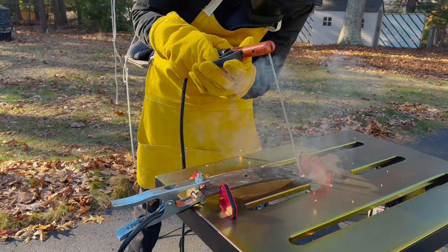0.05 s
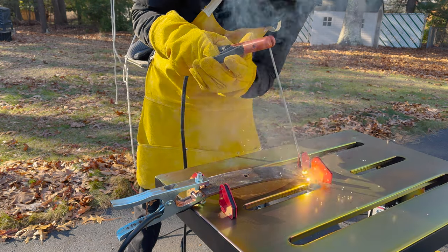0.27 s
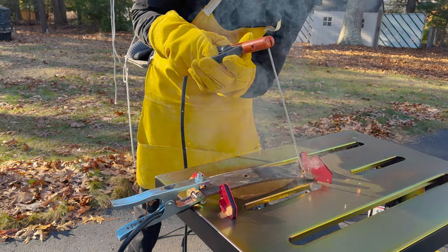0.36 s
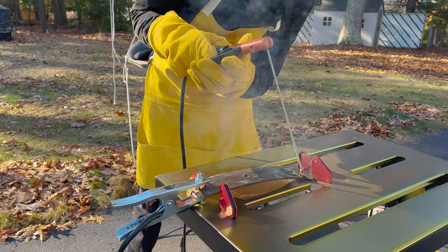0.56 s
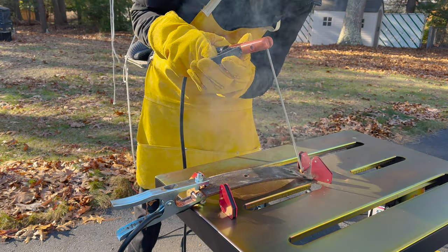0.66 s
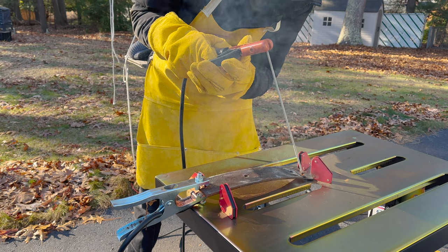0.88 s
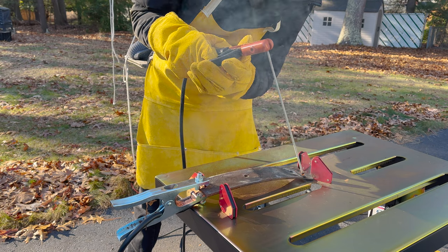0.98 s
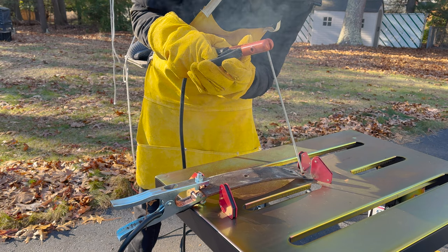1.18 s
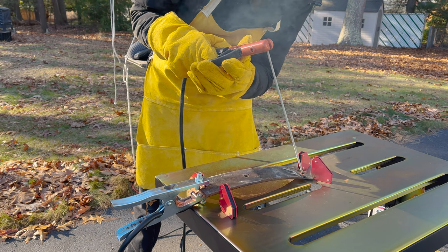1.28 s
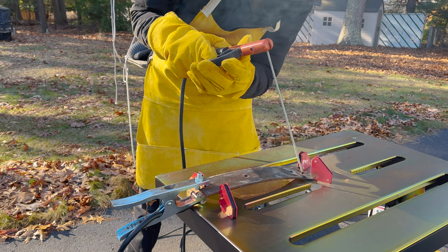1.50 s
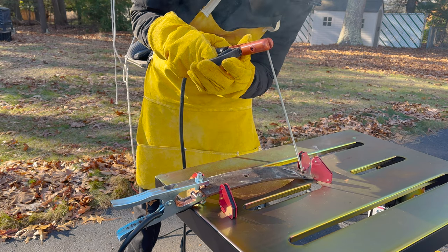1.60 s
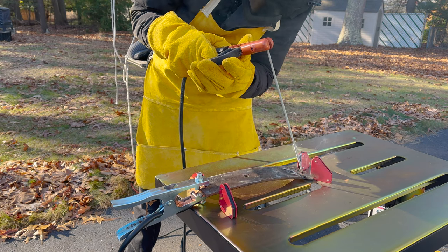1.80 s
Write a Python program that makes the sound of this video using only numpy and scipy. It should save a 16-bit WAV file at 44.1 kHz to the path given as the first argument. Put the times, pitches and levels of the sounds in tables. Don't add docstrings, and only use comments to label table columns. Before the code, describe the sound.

Welding rod on a steel table: brief crackle, two sharp thumping pops, then fading fizz and spits

```python
import sys
import numpy as np
from scipy import signal
from scipy.fft import rfft, irfft, next_fast_len
from scipy.io import wavfile
from scipy.ndimage import uniform_filter1d, map_coordinates

SR = 44100
rng = np.random.default_rng(int(sys.argv[2]) if len(sys.argv) > 2 else 0)


def field_ratio(decibels):
    return 10 ** (np.asarray(decibels, dtype=float) / 20)


def dump_mix(stems):
    frames = np.atleast_2d(stems).T
    limited = np.clip(frames, -1, 1)
    pcm = np.round(limited * 32767).astype(np.int16)
    wavfile.write(sys.argv[1], SR, pcm)


N = 81585


def unit(x):
    return x / np.sqrt(np.mean(x ** 2) + 1e-20)


def along(points, hz):
    f, v = np.transpose(points)
    return np.interp(np.log(hz + 1), np.log(f + 1), v)


def filtered(x, response):
    m = next_fast_len(N + 8192)
    return irfft(rfft(x, m) * response(np.fft.rfftfreq(m, 1 / SR)), m)[..., :N]


def coloured(x, spectrum):
    mean = np.sqrt(np.mean(field_ratio(along(spectrum, np.linspace(0, SR / 2, 999))) ** 2))
    return filtered(x, lambda hz: field_ratio(along(spectrum, hz)) / mean)


def wobble(rate):
    return map_coordinates(rng.standard_normal(N // 20), [np.arange(N) * rate / SR])


def since(s):
    t = np.arange(N) / SR - s
    return np.maximum(t, 0), t >= 0


def ring(s, modes):
    t, on = since(s)
    return on * sum(field_ratio(db - 60 * t / t60) * np.sin(2 * np.pi * hz * t) for hz, db, t60 in modes)


def crackle(rate, spread_db, bed):
    spike_db = np.minimum(spread_db * rng.exponential(size=N), 15)
    spikes = (rng.random(N) < rate / SR) * field_ratio(spike_db)
    return unit(rng.standard_normal(N) * (bed + uniform_filter1d(spikes, size=12) * 12))


def echo(x, t60s, wait_s):
    hz, t, z = signal.stft(rng.standard_normal(SR // 2), SR, nperseg=128)
    tail = signal.istft(z * field_ratio(-60 * t / along(t60s, hz)[:, None]), SR, nperseg=128)[1]
    return signal.fftconvolve(np.pad(x, (round(wait_s * SR), 0)), tail / np.linalg.norm(tail))[:N]


def road():
    # frequency in Hz, level in dB.
    road_spectrum = [(15, -49.5), (30, -14), (42, -10), (59, -1.5), (140, -12), (268, -17), (386, -10.5),
                     (488, -24.5), (515, -16.5), (1900, -26), (2470, -44), (4180, -120)]
    # frequency in Hz, likeness of left and right from -1 to 1.
    road_alike = [(30, .997), (90, 0.98), (180, 0.8), (500, 0.95), (720, -0.38), (1400, -0.43),
                  (1750, 0.74), (2100, .92)]

    def mid_and_side(hz):
        angle = np.arccos(np.clip(along(road_alike, hz), -1, 1)) / 2
        return field_ratio(along(road_spectrum, hz)) * [np.ones(len(hz)), np.tan(np.minimum(angle, 1.2))]

    swell = field_ratio(0.34 * wobble(9.1) + 0.27 * wobble(25))
    mid, side = filtered(rng.standard_normal((2, N)) * swell, mid_and_side)
    return field_ratio(-42.5) * np.array([mid + side, mid - side]) / np.std(mid)


def open_air():
    # frequency in Hz, level in dB.
    air_spectrum = [(1500, -30), (1900, -12.5), (2400, -5.5), (3100, -16), (4200, -22), (4700, -27),
                    (11500, -41), (13500, -29.5)]
    return field_ratio(-69) * unit(coloured(rng.standard_normal(N), [(1200, -66.0)] + air_spectrum))


def hum():
    # frequency in Hz, level in dB, width in Hz.
    hum_lines = [(69.5, -46, 9), (141, -50, 3), (297, -53.5, 2.5), (522, -58, 4)]
    # time in seconds, lowest line in dB, second line in dB.
    engine_swell = [(0, -30, -28), (.45, 2.5, -1.5), (.75, -20, -32), (0.949, 3, -2.5), (1.1, 0.5, 1.5),
                    (1.16, -10, -0.5), (1.3, 7, 3), (1.5, -8, 2), (1.7, 4.5, -1), (1.85, -13, -8.5)]
    # time in seconds, level in dB.
    fan_swell = [(0, -2), (.45, -2), (.7, 2.5), (1.15, 3), (1.35, -5), (1.7, -4), (1.85, 0)]
    sway_db, sway_rad = 1.6, 0.6
    t = np.arange(N) / SR
    lines = []
    for hz, db, width_hz in hum_lines:
        strength = field_ratio(db + sway_db * wobble(width_hz)) * np.sqrt(2)
        lines.append(strength * np.sin(2 * np.pi * hz * t + sway_rad * wobble(width_hz)))
    s, *swells_db = np.transpose(engine_swell)
    engine = sum(field_ratio(np.interp(t, s, db)) * line for db, line in zip(swells_db, lines))
    fan = field_ratio(np.interp(t, *np.transpose(fan_swell))) * lines[3]
    return engine + lines[2] + fan


def slag():
    # time in seconds, level in dB.
    fizz_spells = [
        [(0.0, -69), (0.066, -69.5), (0.076, -65), (0.122, -81), (0.158, -70), (0.166, -72), (0.172, -78)],
        [(0.27, -64), (0.366, -76), (0.418, -79), (0.584, -76), (0.59, -60), (0.602, -72), (0.632, -66),
         (0.655, -73)],
        [(0.682, -72.5), (0.71, -70), (0.716, -69), (0.912, -79), (0.934, -71), (0.982, -81.5), (1.2, -81.5),
         (1.32, -97), (1.45, -100)],
    ]
    # frequency in Hz, level in dB.
    slag_spectrum = [(1500, 0.5), (3000, -1.5), (4700, -5), (6500, -1), (8300, -3), (10000, -3.5),
                     (11500, -6), (14000, -4.5)]
    s, db = np.transpose([row for spell in fizz_spells for row in spell])
    fizz_db = np.interp(np.arange(N) / SR, s, db, right=-120) + 5.5 + 1.6 * wobble(60)
    return coloured(field_ratio(fizz_db) * crackle(2500, 4, bed=3.1), slag_spectrum)


def arc():
    # start in seconds, length in seconds, level in dB.
    burns = [
        (0.181, 0.067, -38),
        (0.2345, .0125, -28),
    ]
    # start in seconds, click in dB.
    sparks = [(.0742, -55), (.1545, -55), (.1808, -21), (.1939, -22), (.2030, -21), (.2125, -21),
              (.2160, -23), (.2254, -31), (.2369, -17), (.2399, -8), (.2422, -16), (.2472, -8)]
    # dB under the click, t60 in seconds.
    puffs = [(-2, 0.011), (-2, .01), (11, .015), (21, .006), (12, .006), (12.5, 0.024), (11.5, .005),
             (4, .008), (26, 0.0044), (22, .006), (11.5, .004), (25, .016)]
    # frequency in Hz, level in dB.
    arc_spectrum = [(150, -6.5), (600, 1.5), (3900, -6), (4700, -21.5), (6800, -8.5), (8500, -16),
                    (11500, -9.5), (13500, -17)]
    spark_spectrum = [(700, -38.5), (2000, 1.5), (3600, -5.5), (4800, -4.5), (6500, -4.5), (10000, -6.5),
                      (11600, -25), (14000, -3.5)]
    rise_s, die_t60_s = 0.0016, 0.0045
    burn, hiss, clicks = 0, 0, np.zeros(N)
    for s, length_s, db in burns:
        t, on = since(s)
        decay_db = 60 * np.maximum(t - length_s, 0) / die_t60_s
        burn = burn + on * (1 - np.exp(-t / rise_s)) * field_ratio(db - decay_db)
    for (s, click_db), (under_db, t60) in zip(sparks, puffs):
        t, on = since(s)
        hiss = hiss + on * field_ratio(click_db - under_db - 60 * t / t60)
        clicks[round(s * SR)] = field_ratio(click_db)
    plasma = coloured(burn * crackle(1300, 3, bed=1.5), arc_spectrum)
    return plasma + coloured(clicks + hiss * rng.standard_normal(N), spark_spectrum)


def pops():
    # start in seconds, frequency in Hz, peak in dB, t60 in seconds.
    chatter = [(.1806, 1900, -25, .003), (.1810, 480, -26, .025), (.1938, 2800, -22, .003),
               (.2028, 2700, -18, .003), (.2123, 2600, -21, .004), (.2134, 3200, -24, .004),
               (.2351, 1900, -20, .012), (.2356, 2300, -18, .01), (.2368, 2700, -13, .01),
               (.2381, 1700, -14, .004), (.2387, 1100, -12, .005), (.2464, 1450, -9, .004),
               (.6670, 2300, -35, .003), (.6678, 650, -33, .008)]
    # start in seconds, frequency in Hz, peak in dB, t60 in seconds.
    sag = [
        (.2416, 250, -20, .02),
        (.2491, 215, -12.5, .026),
        (.2533, 125, -20, .025),
        (.2496, 2000, -23, .012),
        (.2555, 1200, -28, .015),
    ]
    pop_starts = [.23988, .24723]
    # pop level in dB, thump in dB.
    pop_levels = [
        (-4.5, -3),
        (-2.5, -1),
    ]
    # frequency in Hz, level in dB, t60 in seconds.
    snap_modes = [(2350, 0, .0028), (3100, -9, .0025)]
    thump_modes = [(390, -15, 0.016), (505, -7.5, 0.019), (700, -14, 0.009), (970, -4, .008),
                   (1500, -15, .012)]
    thump_lag_s = 0.00016
    blows = sum(ring(s, [mode]) for s, *mode in chatter + sag)
    for s, (db, thump_db) in zip(pop_starts, pop_levels):
        thump = field_ratio(thump_db) * ring(s + thump_lag_s, thump_modes)
        blows = blows + field_ratio(db) * (thump - ring(s, snap_modes))

    def blow_tone(hz):
        bass_cut = 1j * hz / (130 + 1j * hz)
        above = (1 + np.tanh((hz - 4150) / 150)) / 2
        return bass_cut * field_ratio(-14 * above)

    return filtered(blows, blow_tone)


def spits():
    # start in seconds, click in dB, puff in dB under the click, puff t60 in seconds, brightness 0 to 1.
    bursts = [(.2485, -36, 1, 0.016, 0.8), (.315, -52, 12, .005, 1), (.323, -52, 12, .005, 1),
              (0.3362, -49, 10, .008, 1), (.344, -48, 9, .006, 1), (.349, -48, 8, .006, 0.9),
              (.363, -54, 5, .006, 1), (.370, -46.5, 10, .006, 1), (.375, -52, 8, .008, 0.9),
              (.358, -51, 10, .005, 1), (.396, -55, 9, .006, 1), (0.402, -54, 10, .006, 0.1),
              (.452, -53.5, 8, 0.028, 0), (0.493, -49.5, 8, 0.026, .3), (0.5347, -45, 12, .004, 0.4),
              (0.5509, -43.5, 4, .004, 0.15), (0.571, -54, 1, 0.014, 0.4), (0.5906, -44.5, 8, .015, .4),
              (.611, -52, 3, 0.019, 0.5), (.623, -57, 2, .01, .5), (.645, -55, 2, .012, .5),
              (.6335, -51, -2, 0.012, .4), (0.6668, -36, -5, 0.0038, 0), (0.6672, -21.5, 28.5, 0.06, 0.02),
              (.716, -59, 1, 0.14, 0.9), (.92, -45, 9, 0.0077, 0.1), (0.936, -57, 7, .004, .4)]
    # frequency in Hz, level in dB.
    dull_spectrum = [(900, -25), (2000, 6), (4500, -3.5), (6600, 0), (9000, -7), (11500, -15), (13500, -14),
                     (16000, -4.5)]
    bright_spectrum = [(3000, -30), (7000, -22), (9500, 2), (11500, -7), (13500, -2), (16000, -4.5)]
    white, noise = np.zeros((2, N)), rng.standard_normal(N)
    for s, click_db, under_db, t60, bright in bursts:
        t, on = since(s)
        burst = on * field_ratio(click_db - under_db - 60 * t / t60) * noise
        burst[round(s * SR)] += field_ratio(click_db)
        white = white + np.outer(np.sqrt([1 - bright, bright]), burst)
    return coloured(white[0], dull_spectrum) + coloured(white[1], bright_spectrum)


def bird():
    # start in seconds, first pitch in Hz, top pitch in Hz.
    whistles = [
        (.848, 6500, 8500),
        (.99, 6200, 8250),
        (1.112, 5950, 8300),
        (1.249, 6200, 8200),
    ]
    whistle_levels = [-74, -72.5, -74.5, -72.5]
    length_s, rise_s, fade_db, flutter_db = 0.062, 0.012, 5, 3.5
    trees_t60_s, trees_db = 0.3, 1.5
    out = 0
    for (s, low_hz, top_hz), db in zip(whistles, whistle_levels):
        t, on = since(s)
        left = np.clip(1 - t / length_s, 0, 1)
        shape = on * np.minimum(t / rise_s, 1) * np.minimum(left * 6, 1)
        shape = shape * field_ratio(db + fade_db * left + flutter_db * wobble(170))
        pitch_hz = top_hz - (top_hz - low_hz) * left ** 2
        note = np.sqrt(2) * shape * np.sin(2 * np.pi * np.cumsum(pitch_hz) / SR)
        scattered = echo(note * field_ratio(flutter_db * wobble(400)), [(7000, trees_t60_s)], 0.0039)
        out = out + note + field_ratio(trees_db) * scattered
    return out


def scene():
    # frequency in Hz, t60 of the yard in seconds.
    yard_t60s = [(200, 0.083), (2500, 0.14), (10000, 0.057)]
    near = slag() + arc() + pops() + spits()
    yard = field_ratio(-26.5) * echo(near, yard_t60s, 0.006)
    return near + yard + bird() + hum() + open_air() + road()


def band_limit(x):
    return signal.sosfilt(signal.butter(12, 16620, fs=SR, output="sos"), x)


def record(dry):
    # frequency in Hz, lead of the left port in radians.
    port_lead = [(20, 0.12), (500, -0.22), (1200, -1), (1580, 1), (1850, 1), (3300, 0.49), (5000, 0.39),
                 (6500, 0), (7250, 1.2), (7500, 3.14), (7750, 4.8), (9500, 6), (10700, 3.5), (11800, 3.5),
                 (13800, -0.1), (15200, 1.5)]
    # frequency in Hz, left minus right in dB.
    left_louder = [(300, 0), (700, -.6), (1550, -1.2), (1900, 2.5), (2500, .5), (5000, 0)]
    # frequency in Hz, level in dB.
    top_cut = [(15850, 0), (16050, -24), (16550, -28), (16620, -120)]

    def ports(hz):
        split = 1j * along(port_lead, hz) + np.log(field_ratio(along(left_louder, hz)))
        return field_ratio(along(top_cut, hz)) * np.exp(0.5 * np.outer([1, -1], split))

    return band_limit(filtered(dry, ports))


dry = scene()
out = record(dry)
dump_mix(out)
```